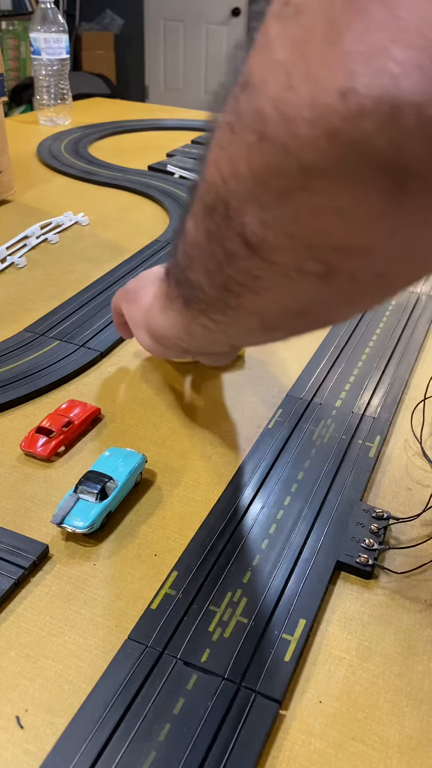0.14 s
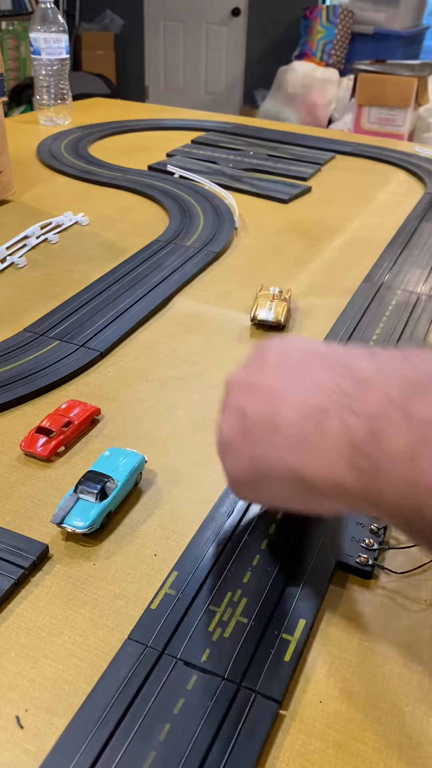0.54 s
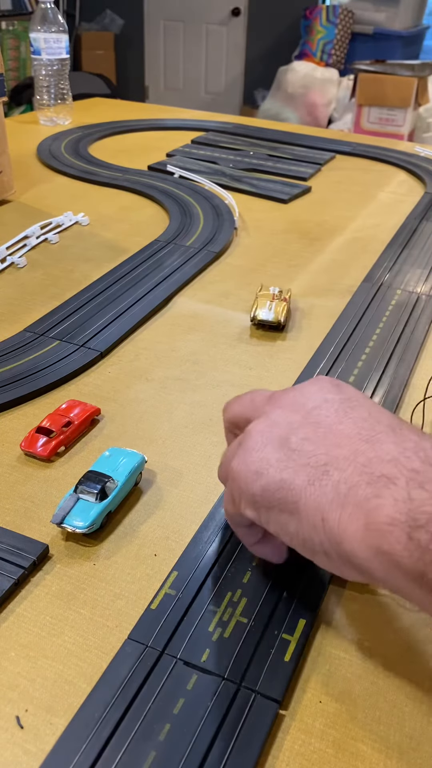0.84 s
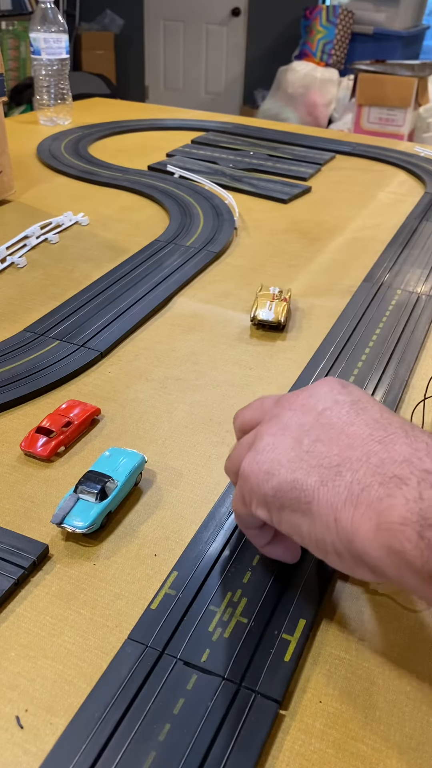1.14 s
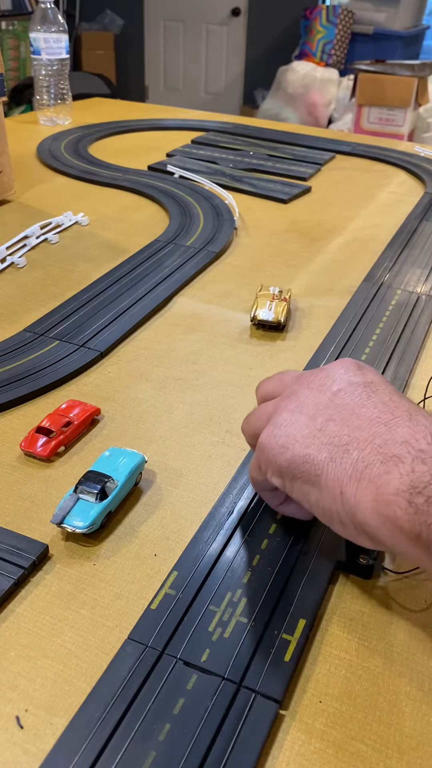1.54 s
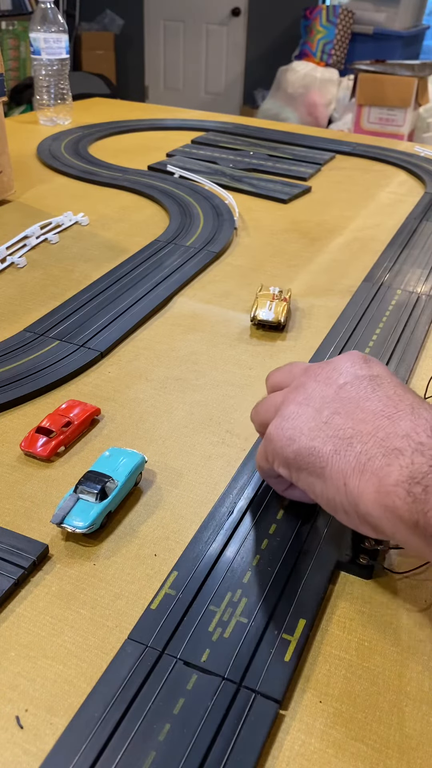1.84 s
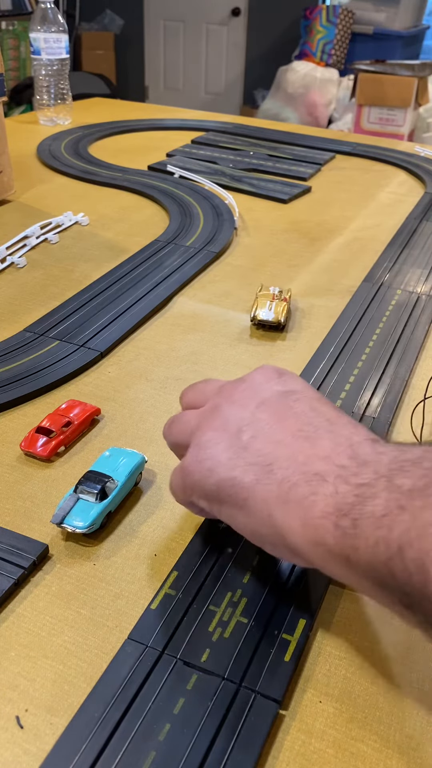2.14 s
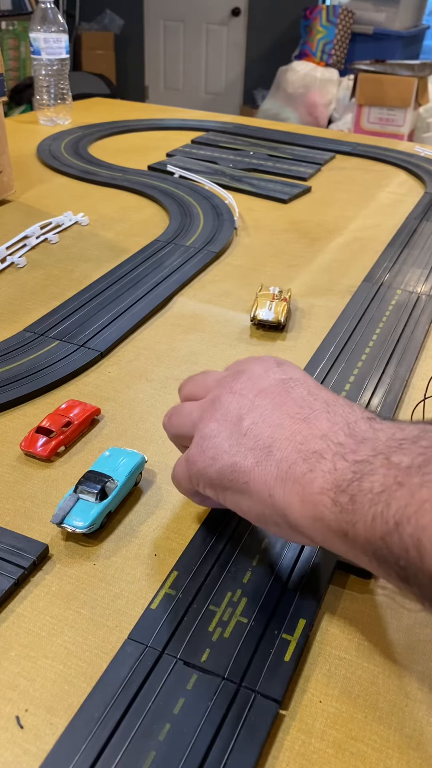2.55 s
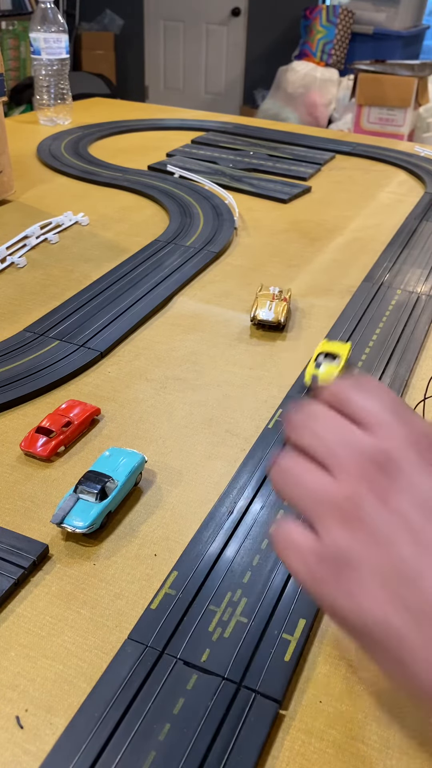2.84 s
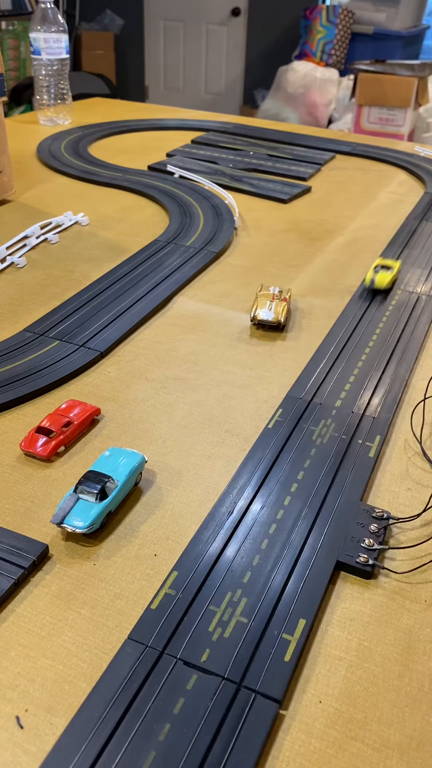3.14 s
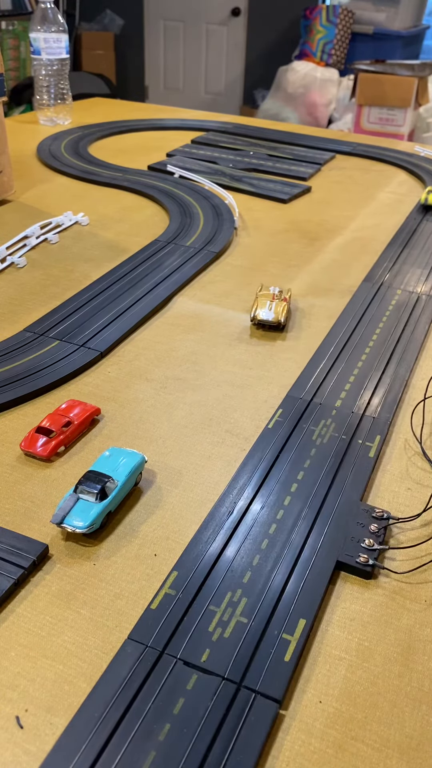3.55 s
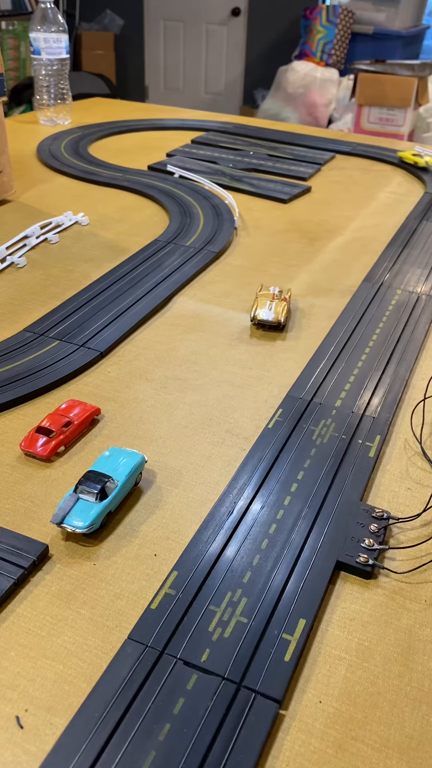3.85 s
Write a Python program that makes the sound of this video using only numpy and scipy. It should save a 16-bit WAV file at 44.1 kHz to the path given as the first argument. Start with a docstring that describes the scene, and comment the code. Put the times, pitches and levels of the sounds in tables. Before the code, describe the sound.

Small plastic car fiddled onto its track with knocks and scuffs, then buzzing off harshly

```python
"""Toy slot car on a plastic track

A slot car is handled on a track laid on a table in a small room, close to a phone, and then drives off.
Handling: impacts excite the modes of the hollow track and the table, tyres scuff by stick and slip,
a squeak glides upward, and gear teeth excite the resonances of their train.
Running: pickup shoes scrape the rails in pulses once a turn of the axle, the motor whirs, the chassis
rattles and clacks over the rail joints, and the table booms once. Faint hum and room air lie beneath."""
import sys
import numpy as np
from scipy import signal
from scipy.fft import rfft, irfft
from scipy.io import wavfile
from scipy.ndimage import uniform_filter1d, map_coordinates

SR = 44100
rng = np.random.default_rng(int(sys.argv[2]) if len(sys.argv) > 2 else 0)


def write(x):
    x = np.atleast_2d(x).T
    wavfile.write(sys.argv[1], SR, np.round(np.clip(x, -1, 1) * 32767).astype(np.int16))


N = 176400
START_S = 2.366  # the car drives off


def amp(db):
    """Level law: decibels to amplitude gain."""
    return 10 ** (np.asarray(db) / 20)


def unit(x):
    """Normalisation: scale to rms 1."""
    return x / np.sqrt(np.mean(x ** 2) + 1e-20)


def clock():
    """Time axis: seconds at every sample."""
    return np.arange(N) / SR


def noise():
    """White noise: equal power at all frequencies."""
    return rng.standard_normal(N)


def wander(size):
    """Random drift: noise smoothed twice over size samples, spread 1."""
    return unit(uniform_filter1d(uniform_filter1d(noise(), size), size))


def fade(t60):
    """Exponential decay: 60 dB down after t60 seconds."""
    return np.exp(-np.log(1000) * clock() / t60)


def gate(start, length, ramp):
    """Trapezoidal envelope: rise, hold and fall, in seconds."""
    t = clock() - start
    return np.clip(np.minimum(t, length - t) / ramp, 0, 1)


def convolve(x, response):
    """Linear superposition: each sample of x launches the response."""
    return signal.fftconvolve(x, response)[:N]


def steep(x, order, hz, kind):
    """Butterworth filter: keep the band above ("high") or below ("low") a corner."""
    return signal.sosfilt(signal.butter(order, hz, kind, fs=SR, output="sos"), x)


def along(points, hz):
    """Interpolation of (Hz, value) points on a log-frequency axis."""
    f, v = np.array(points, float).T
    return np.interp(np.log(hz + 1), np.log(f), v)


def colour(x, points, size=2048):
    """Minimum-phase filtering: the folded cepstrum of a (Hz, dB) shape gives a causal response."""
    cepstrum = irfft(np.log(amp(along(points, np.fft.rfftfreq(size, 1 / SR)))))
    cepstrum[1:size // 2] *= 2
    cepstrum[size // 2 + 1:] = 0
    response = irfft(np.exp(rfft(cepstrum)))
    return convolve(x, response / np.linalg.norm(response))


def ring(modes):
    """Modal superposition: damped sinusoids, of unit energy together."""
    y = sum(amp(db) * fade(t60) * np.sin(2 * np.pi * hz * clock()) for hz, db, t60 in modes)
    return y[:SR // 2] / np.linalg.norm(y)


def resonate(x, hz, width):
    """Simple resonance: one band-pass peak."""
    return signal.lfilter(*signal.iirpeak(hz, hz / width, SR), x)


def glide(x, hz, width, speed):
    """Time warping: a double resonance read at varying speed scales its pitch, and the pace of x."""
    resonant = resonate(resonate(x, hz, width), hz, width)
    return unit(map_coordinates(resonant, [np.cumsum(speed)], mode="mirror"))


def taps(times, sizes):
    """Impulse train: one sample of given size at each time."""
    return np.bincount(np.clip(times * SR, 0, N).astype(int), sizes, N + 1)[:N]


def bursts(times, sizes, t60):
    """Gritty contact: decaying noise bursts; size is the rms over a hundredth of a second."""
    power = fade(t60)[:SR // 4] ** 2
    window = SR / 100
    return noise() * np.sqrt(np.abs(convolve(taps(times, sizes ** 2), power / power.sum() * window)))


# Mains and appliance hum. Each row: frequency in Hz, level in dB.
HUM = [(59.2, -61.5), (118.4, -65), (242.2, -64.5)]
# Spectrum of the still air. Each row: frequency in Hz, relative level in dB.
AIR = [(20, -18), (45, -14), (80, -6.5), (210, 0), (320, -6), (700, -15), (2000, -37), (6000, -37),
       (10000, -50), (12000, -59), (16000, -79)]
# Stereo width of the air. Each row: frequency in Hz, side over mid in dB.
AIR_WIDTH = [(40, -15), (120, -22.5), (250, -18), (500, -0.5), (1000, 6.5), (4000, -34)]
AIR_DB = -57.5


def background():
    """Steady sources: sinusoidal hum, and coloured noise with its own mid and side."""
    hum = sum(amp(db) * unit(np.sin(2 * np.pi * (hz * clock() + rng.random()))) for hz, db in HUM)
    mid, side = (unit(colour(noise(), AIR)) for _ in range(2))
    side = irfft(rfft(side) * amp(along(AIR_WIDTH, np.fft.rfftfreq(N, 1 / SR))), N)
    return hum + amp(AIR_DB) * (mid + side * np.array([[1], [-1]]))


# Modes of the plastic track. Each row: frequency in Hz, relative level in dB, t60 in seconds.
TRACK_MODES = [(510, -19, 0.038), (1035, -5, 0.038), (1130, 3, 0.022), (1367, 5.5, 0.012),
               (1606, 13, 0.0045), (1846, 4.5, 0.0069), (2255, 7.5, 0.01), (2600, -14, 0.014),
               (3370, -7, 0.045)]
# Spectrum of a sharp plastic crack. Each row: frequency in Hz, relative level in dB.
CRACK = [(100, -61), (700, -22), (2500, -0.5), (4400, 6), (5000, 3), (6000, 6.5), (7400, 3), (9000, -0.5),
         (13000, 6.5), (15400, 3)]
TRACK_LOW_HZ = 790


def blows(table, blow_t60, crack_t60):
    """Impact excitation: a blow rings the track, a poor radiator of bass, and adds a sharp crack."""
    times, body_db, crack_db = np.array(table, float).T
    body = convolve(bursts(times, amp(body_db), blow_t60), ring(TRACK_MODES))
    crack = colour(bursts(times, amp(crack_db), crack_t60), CRACK)
    return steep(body, 2, TRACK_LOW_HZ, "high") + crack


# Knocks of the handled car. Each row: time in seconds, level of the blow driving the hollow body in dB,
# level of the crack in dB.
KNOCKS = [(0.012, -53, -37.5), (0.028, -51, -40.5), (0.129, -63, -35.5), (0.137, -51.5, -44),
          (0.182, -48.5, -52), (0.338, -57.5, -47), (0.434, -64.5, -57.5), (0.599, -39, -35.5),
          (0.602, -36.5, -28), (0.689, -47, -74), (0.807, -37.5, -36.5), (0.818, -32.5, -30),
          (0.823, -41, -39.5), (0.847, -68, -44), (0.964, -38.5, -41.5), (1.083, -52, -51.5),
          (1.228, -53, -54), (1.373, -44, -44), (1.436, -49, -69), (1.467, -47.5, -75),
          (1.57, -46.5, -48.5), (1.83, -64, -60), (1.853, -54, -64), (2.079, -47, -49), (2.194, -44, -48),
          (2.225, -45, -39), (2.237, -36.5, -43.5), (2.284, -48.5, -40), (2.293, -42, -38)]
CRACK_T60_S, BLOW_T60_S = 0.039, 0.021


def knocks():
    """Impact excitation: the handled car strikes the track."""
    return blows(KNOCKS, BLOW_T60_S, CRACK_T60_S)


# Heavier blows on the table. Each row: time in seconds, level in dB (doubled below).
THUDS = [(0.026, -40.5), (.82, -39.5), (2.236, -50), (2.365, -48.5)]
# Modes of the table. Each row: frequency in Hz, relative level in dB, t60 in seconds.
TABLE_MODES = [(78, 4, 0.39), (142, 5, 0.083), (208, 4, 0.2), (350, 17.5, 0.011)]


def thuds(low_hz=55):
    """Structure-borne sound: impulses ring the low modes of the table top."""
    times, db = np.array(THUDS).T
    boom = steep(ring(TABLE_MODES), 4, low_hz, "high")
    return convolve(taps(times, amp(db)), 2 * boom / np.abs(boom).max())


SQUEAK_S, SQUEAK_LENGTH_S, SQUEAK_DB = 0.039, 0.0274, -46.5
SQUEAK_HZ, SQUEAK_RISE_HZ_PER_S = 554, 8000


def squeak(overtone_db=-16):
    """Frequency modulation: a rough upward glide with its octave, as the car is picked up."""
    hz = SQUEAK_HZ + SQUEAK_RISE_HZ_PER_S * np.clip(clock() - SQUEAK_S, 0, SQUEAK_LENGTH_S)
    hz = hz * (1 + .12 * wander(size=60))
    phase = 2 * np.pi * np.cumsum(hz) / SR
    tone = unit(np.sin(phase) + amp(overtone_db) * np.sin(2 * phase))
    return amp(SQUEAK_DB) * gate(SQUEAK_S, SQUEAK_LENGTH_S, 0.0014) * tone


# Strokes of the tyres along the track. Each row: start in seconds, length in seconds, level of the hiss
# in dB, level of the rub in dB, first pitch of the rub in Hz, last pitch in Hz.
SCUFFS = [(0.053, 0.19, -62, -60, 2250, 2130), (0.225, 0.15, -65.5, -58, 2000, 1720),
          (0.618, 0.3, -58, -68, 4300, 4300), (0.938, 0.14, -71, -66, 3000, 2300),
          (0.993, 0.0507, -54, -50, 2630, 2200), (1.038, 0.035, -56, -43.5, 1790, 1995),
          (1.097, 0.15, -52.5, -59, 3350, 3350), (1.278, 0.091, -48.5, -59, 2000, 2900),
          (1.347, 0.15, -50, -46.5, 3150, 3600), (1.415, 0.068, -75, -50.5, 1800, 2700),
          (1.5, 0.13, -65, -65, 3600, 3600), (1.617, 0.17, -51, -51, 3400, 3950),
          (1.79, 0.05, -52, -53, 3920, 2900), (2.09, 0.35, -66.5, -58, 2200, 2200),
          (2.216, .17, -50.5, -60, 4030, 4030)]
# Spectrum of the hiss. Each row: frequency in Hz, relative level in dB.
SCUFF = [(150, -39), (450, -6), (900, -11.5), (1800, -4.5), (3500, -4), (4700, 3), (5700, 3), (7500, -3.5),
         (11000, -5.5), (15500, -11.5)]
SCUFF_RAMP_S, SCUFF_GRAINS_PER_S, SCUFF_GRAIN_DB = 0.025, 700, 4
RUB_WIDTH, RUB_WANDER = 0.3, .03  # shares of the rub's pitch


def scuffs(smooth=1.0):
    """Stick-slip friction: fine grains and noise hiss, and a resonance glides over each stroke."""
    slips = np.cumsum(rng.exponential(1, N // 8)) / SCUFF_GRAINS_PER_S
    scatter = np.clip(noise()[:len(slips)], -1.5, 1.5)
    sizes = noise()[:len(slips)] * amp(SCUFF_GRAIN_DB * scatter)
    grains = unit(taps(slips, sizes)) + smooth * noise()
    hiss = unit(colour(grains, SCUFF))
    drift = 1 + RUB_WANDER * wander(size=700)
    out = 0
    for start, length, hiss_db, rub_db, first_hz, last_hz in SCUFFS:
        pitch = np.interp(clock(), [start, start + length], [1, last_hz / first_hz])
        rub = glide(grains, first_hz, RUB_WIDTH * first_hz, pitch * drift)
        out = out + gate(start, length, SCUFF_RAMP_S) * (amp(hiss_db) * hiss + amp(rub_db) * rub)
    return out


# Shoves that turn the gears. Each row: start in seconds, length in seconds, level in dB, pitch ratio.
SHOVES = [(0.907, 0.12, -44, 1.013), (1.285, 0.067, -47, 1.047), (1.406, 0.056, -46.5, 1.0),
          (1.663, 0.047, -41, 1), (1.813, 0.035, -52, 1.01), (1.88, 0.029, -55.5, 0.97),
          (2.101, 0.11, -48, 1.036)]
# Resonances of the gear train. Each row: frequency in Hz, width in Hz, relative level in dB.
GEAR = [(2450, 700, 3.5), (6195, 510, 7), (9300, 1100, -3)]
GEAR_TEETH_HZ, GEAR_ROUGH = 522.3, 0.44  # median tooth rate before the warp; log spread of the gaps
GEAR_SAG_HZ, GEAR_ARCH_HZ, SHOVE_RAMP_S = 200.3, 310, 0.013


def gears(wander_hz=70):
    """Source and filter: uneven tooth ticks drive resonances that rise and sag over each shove."""
    t, push, sag, tuning = clock(), 0, 0, 1
    for start, length, db, pitch in SHOVES:
        push = push + amp(db) * gate(start, length, SHOVE_RAMP_S)
        progress = np.clip((t - start) / length, 0, 1)
        sag = np.where(t > start, progress - .5, sag)  # -.5 at the start, .5 at the end
        tuning = np.where(t > start, pitch, tuning)
    gaps, sizes = rng.standard_normal((2, N // 40))
    teeth = taps(np.cumsum(np.exp(GEAR_ROUGH * gaps)) / GEAR_TEETH_HZ, amp(5.7 * sizes))
    arch = GEAR_ARCH_HZ * (np.cos(np.pi * sag) - .5)
    shift = wander_hz * wander(size=700) - GEAR_SAG_HZ * sag + arch
    return push * unit(sum(amp(db) * glide(teeth, hz, w, tuning + shift / hz) for hz, w, db in GEAR))


# Turns of the axle. Each row: time in seconds, rate in Hz.
AXLE = [(2.37, 68.91), (2.5, 105.8), (2.75, 146.6), (3.05, 158), (3.4, 159.2), (3.65, 152.1), (3.8, 138.5),
        (3.93, 163.6)]
TURN_SHARE, TURN_JITTER = 0.09, 0.019  # decay of a pulse in turns; spread of the rate
TURN_SCATTER_DB, SLIDE_SHARE, BOUNCE_DB = 7.5, 0.71, 1.3


def rail_contact():
    """Amplitude modulation: sliding noise pulses once a turn of the axle, each with a chance force."""
    jitter = unit(uniform_filter1d(noise(), size=400))
    hz = np.interp(clock(), *np.array(AXLE).T) * (1 + TURN_JITTER * jitter)
    turns = np.cumsum(hz) / SR
    force = amp(TURN_SCATTER_DB * np.clip(noise(), -2, 2))[turns.astype(int)]
    pulses = force * np.exp(-(turns % 1) / TURN_SHARE)
    return noise() * (SLIDE_SHARE + pulses) * amp(BOUNCE_DB * wander(size=500))


# Spectrum of the shoes on the rails. Each row: frequency in Hz, relative level in dB.
SCRAPE = [(200, -26.5), (700, -4.5), (2000, -3.5), (3400, -6), (4500, 0.5), (5000, -3), (6100, -2),
          (7500, 2), (9300, 0.5), (11000, 0.5), (12500, -31), (15400, -38)]
# Ringing of the shoes. Each row: frequency in Hz, width in Hz, relative level in dB.
SHOE_RINGS = [(5900, 570, -1.5), (6310, 1100, 7), (7240, 140, 0.5), (7510, 700, -4.5)]
RING_DB, RING_WANDER = -5, 0.017  # level over the scrape; spread of the pitch ratio


def shoe_scrape(contact):
    """Sliding friction: the contact force is coloured and excites wavering shoe resonances."""
    pressure = 1 + RING_WANDER * wander(size=2500)
    rings = unit(sum(amp(db) * glide(contact, f, w, pressure) for f, w, db in SHOE_RINGS))
    return unit(colour(contact, SCRAPE)) + amp(RING_DB) * rings


SIZZLE_HZ, SIZZLE_DB, SIZZLE_FADE_DB_PER_S = 12200, -18, 7


def sizzle(contact):
    """Treble loss with distance: the top of the contact noise fades steadily in dB."""
    level = amp(SIZZLE_DB - SIZZLE_FADE_DB_PER_S * (clock() - START_S))
    return level * unit(steep(contact, 8, SIZZLE_HZ, "high"))


RATTLE_PER_S, RATTLE_SCATTER_DB = 190, 3
RATTLE_BODY_DB, RATTLE_CRACK_DB = -12, -8.5  # relative to the levels of the run
RATTLE_RING_DB, RATTLE_RING_WIDTH_HZ = 29.5, 670


def chassis_rattle():
    """Random impacts: the loose chassis hops, ringing the hollow track and ticking on the rails."""
    hops = np.cumsum(rng.exponential(1, N // 100)) / RATTLE_PER_S
    sizes = amp(RATTLE_SCATTER_DB * np.clip(noise()[:len(hops)], -2, 2))
    rattle = bursts(hops, sizes, 0.0052)
    hollow = unit(convolve(rattle, ring(TRACK_MODES)))
    ringing = amp(RATTLE_RING_DB) * resonate(rattle, SHOE_RINGS[1][0], RATTLE_RING_WIDTH_HZ)
    ticks = unit(colour(rattle, SCRAPE) + ringing)
    return amp(RATTLE_BODY_DB) * hollow, amp(RATTLE_CRACK_DB) * ticks


# The whir of the motor in the hollow track, whose pitch changes from piece to piece.
# Each row: time in seconds, pitch in Hz, level in dB.
WHIR = [(2.37, 1302, -51), (2.459, 1332, -37.5), (2.66, 1401, -41.5), (2.69, 2255, -40), (2.8, 1649, -46),
        (3.1, 1653, -53.5), (3.421, 1650, -54), (3.539, 2212, -54.5), (3.649, 1712, -75)]
WHIR_WIDTH_HZ, WHIR_WANDER = 1100, .02  # width at the first pitch; spread of the pitch ratio


def motor_whir(contact):
    """Cavity resonance: a broad peak over the contact noise follows the pitch of the track."""
    times, hz, db = np.array(WHIR).T
    pitch = np.interp(clock(), times, hz) / hz[0] * (1 + WHIR_WANDER * wander(size=1500))
    return amp(np.interp(clock(), times, db)) * glide(contact, hz[0], WHIR_WIDTH_HZ, pitch)


# Spectrum of the wheels on the table. Each row: frequency in Hz, relative level in dB.
ROLL = [(50, -38), (90, 11), (180, 5), (330, 8.5), (600, 9.5), (1200, -7.5), (4000, -29)]
ROLL_DB = -56.5


def wheel_roll(contact):
    """Rolling noise: the contact noise, coloured toward the bass."""
    return amp(ROLL_DB) * unit(colour(contact, ROLL))


# Clacks over joints and bumps. Each row: time in seconds, level of the blow driving the hollow body
# in dB, level of the crack in dB.
CLACKS = [(2.367, -35.5, -29), (2.386, -38, -26), (2.43, -44, -27.5), (2.448, -45, -25.5),
          (2.465, -48, -28), (2.483, -43, -36), (2.499, -46, -28), (2.521, -47, -26.5), (2.535, -55, -29),
          (2.542, -62, -38), (2.558, -54, -32), (2.6, -35, -30), (2.62, -51, -30.5), (2.665, -53, -36),
          (2.68, -35.5, -41), (2.701, -43, -34.5), (2.75, -39, -32.5), (2.808, -41.5, -37),
          (3.008, -49.5, -31), (3.323, -47, -38.5), (3.688, -54, -56), (3.905, -64, -50), (3.93, -62, -34),
          (3.948, -62, -53), (3.969, -66, -51)]
CLACK_T60_S = .011


def clacks():
    """Impact excitation: the running car strikes joints and bumps."""
    return blows(CLACKS, CLACK_T60_S, CLACK_T60_S)


BOOM_S, BOOM_WIDTH_S, BOOM_HZ, BOOM_DB = 3.86, 0.1, 178, -51.5  # width: centre to 1/e


def bend_boom():
    """Resonance: the table swells on a tone and narrow noise as the car enters the bend."""
    swell = np.exp(-((clock() - BOOM_S) / BOOM_WIDTH_S) ** 2)
    rough = unit(resonate(noise(), BOOM_HZ, 54))
    return amp(BOOM_DB) * swell * unit(np.sin(2 * np.pi * BOOM_HZ * clock()) + 0.87 * rough)


# Course of the run. Each row: time in seconds, level driving the track's rumble in dB,
# level driving the scrape on the rails in dB.
RUN = [(2.38, -46, -31), (2.48, -40.5, -33), (2.68, -37, -36), (2.82, -35.5, -33.5), (3.001, -47, -35),
       (3.1, -44, -40), (3.35, -58, -39.5), (3.53, -40, -41), (3.65, -50, -43), (3.82, -50, -43),
       (3.921, -68, -40), (4.0, -55, -37.5)]


def running_car():
    """Superposition: one contact noise drives scrape, sizzle, whir and roll; rattle and boom join."""
    times, body_db, scrape_db = np.array(RUN).T
    body = amp(np.interp(clock(), times, body_db))
    rails = amp(np.interp(clock(), times, scrape_db))
    contact = rail_contact()
    hollow, ticks = chassis_rattle()
    on_rails = rails * (shoe_scrape(contact) + ticks + sizzle(contact))
    on_track = body * hollow + motor_whir(contact) + wheel_roll(contact) + bend_boom()
    return gate(START_S, 10, 0.00096) * (on_rails + on_track)


# Echo of the table as the car moves. Each row: time in seconds, lag in seconds.
ECHO = [(2.37, 0.0008), (2.55, 0.00081), (2.85, 0.0018), (3.15, 0.0015), (3.7, 0.001093), (4, 0.001)]
ECHO_DB = -10


def table_echo(x):
    """Comb filtering: a sliding echo interferes with the direct sound, a faint gliding whine."""
    delay = np.interp(clock(), *np.array(ECHO).T)
    return x + amp(ECHO_DB) * map_coordinates(x, [(clock() - delay) * SR])


# Phase by which the left microphone port leads. Each row: frequency in Hz, phase in radians.
PORT_PHASE = [(60, 0), (2000, 0), (2800, .8), (3600, .5), (4400, 1.4), (4850, 3.6), (5250, 6.4),
              (7000, 7.25), (9000, 8.2), (10800, 8.8), (12000, 9.27), (16000, 9.22)]
# Level of the left port over the right. Each row: frequency in Hz, level in dB.
PORT_BALANCE = [(100, 0.9), (380, 6), (1300, 2.4), (2400, -3.1), (4400, -2), (8000, -0.4)]


def ports(x):
    """Interchannel differences: two microphone ports differ in phase and level, shared half each."""
    hz = np.fft.rfftfreq(N, 1 / SR)
    half = np.exp(.5j * along(PORT_PHASE, hz)) * amp(along(PORT_BALANCE, hz) / 2)
    return irfft(rfft(x) * np.array([half, 1 / half]), N)


ROOM_T60_S, ROOM_TREBLE_T60_S = 0.41, 0.11
EARLY_T60_S, EARLY_DB = 0.025, 10  # first echoes from the table top and the arm
PLACE_S = .15  # time over which the echoes change to those of another place


def room(x):
    """Diffuse reverberation: decaying noise tails, alike at both ports in the bass, change with place."""
    own = np.array([noise(), noise()])
    shared_bass = steep(noise(), 10, 2255, "low")
    low = shared_bass + steep(steep(own, 10, 1393, "high"), 10, 6330, "low")
    high = steep(steep(own, 10, 4500, "high"), 10, 10400, "low")
    size, hop = SR // 2, int(PLACE_S * SR)
    early = gate(0.00033, 2, 0.00096) * (1 + amp(EARLY_DB) * fade(EARLY_T60_S))
    low_fade = (early * fade(ROOM_T60_S))[:size]
    high_fade = (early * fade(ROOM_TREBLE_T60_S))[:size]
    padded, out = np.pad(x, (hop, 2 * hop)), np.zeros((2, N + 3 * hop + size))
    for i in range(0, N + hop, hop):
        k = rng.integers(N - size)
        tail = low[:, k:k + size] * low_fade + high[:, k:k + size] * high_fade
        tail = tail / np.linalg.norm(tail, axis=1, keepdims=True)
        piece = padded[i:i + 2 * hop] * signal.windows.cosine(2 * hop)  # overlaps keep the power
        out[:, i:i + 2 * hop + size - 1] += signal.fftconvolve(piece[None], tail)
    return out[:, hop:hop + N]


NEAR_ROOM_DB, ROOM_DB, FAR_ROOM_DB = -8.5, -7.5, -7  # handling, start of the run, end of the run


def scene():
    """Direct and reverberant field: handling, then the run, whose room share grows as it drives away."""
    handling = knocks() + thuds() + squeak() + scuffs() + gears()
    run = table_echo(running_car()) + clacks()
    wet = amp(np.interp(clock(), [START_S, N / SR], [ROOM_DB, FAR_ROOM_DB]))
    reverberant = room(handling * amp(NEAR_ROOM_DB) + run * wet)
    return background() + ports(handling + run) + reverberant


TOP_HZ = 15900


def record(dry):
    """Band limiting: a steep elliptic low-pass ends the sound at TOP_HZ."""
    return signal.sosfilt(signal.ellip(10, .2, 80, TOP_HZ, fs=SR, output="sos"), dry)


dry = scene()
out = record(dry)
write(out)
```